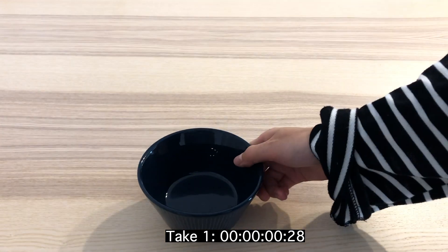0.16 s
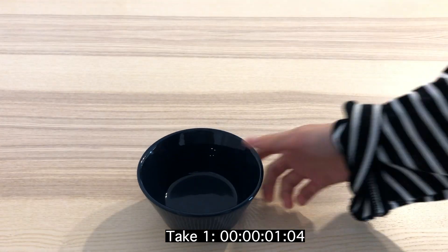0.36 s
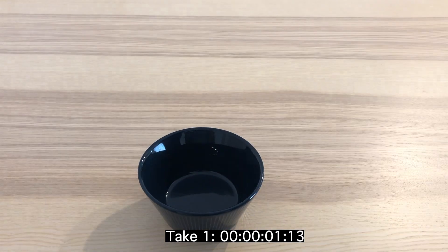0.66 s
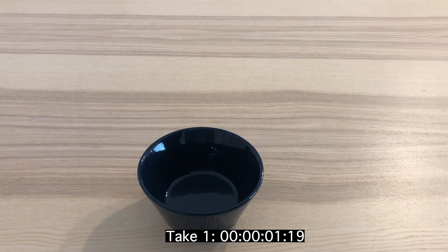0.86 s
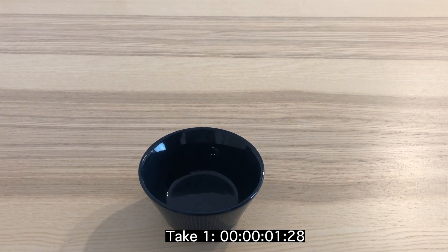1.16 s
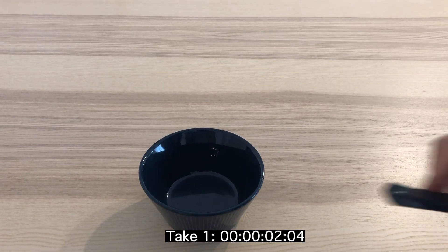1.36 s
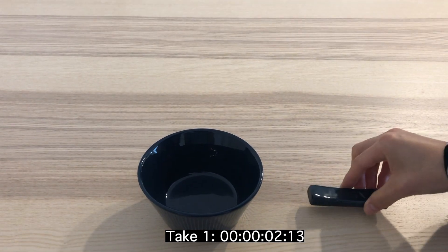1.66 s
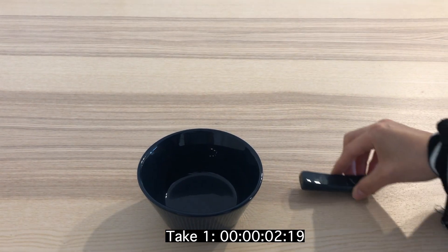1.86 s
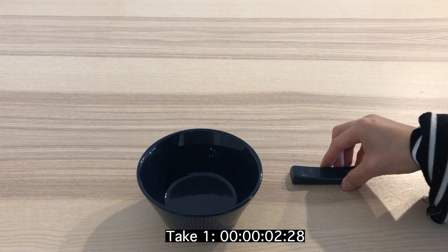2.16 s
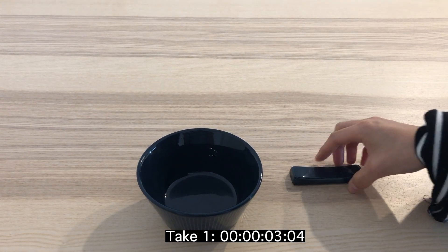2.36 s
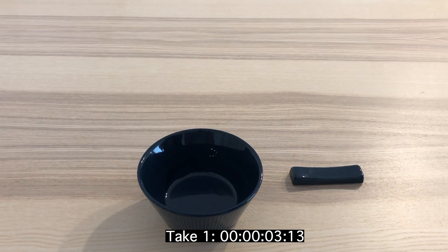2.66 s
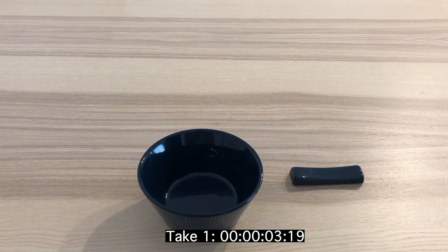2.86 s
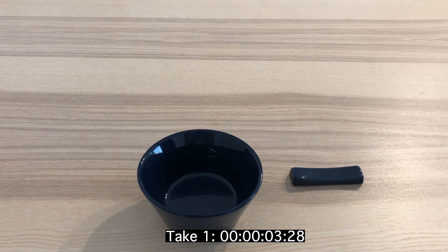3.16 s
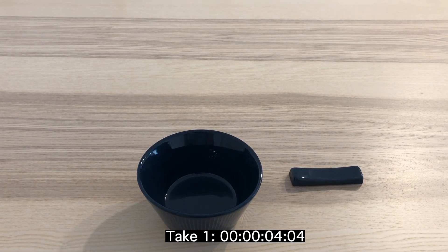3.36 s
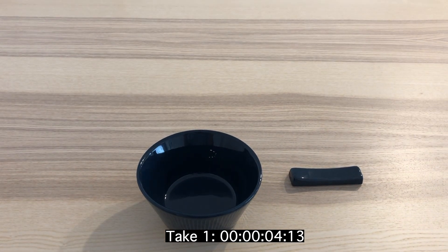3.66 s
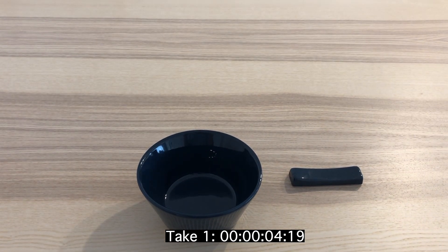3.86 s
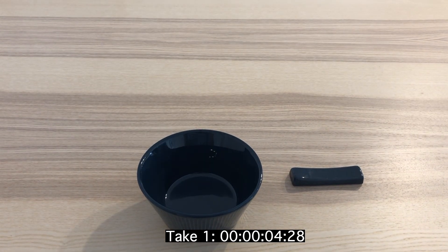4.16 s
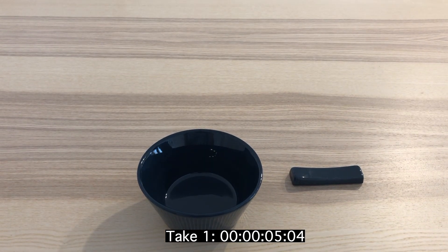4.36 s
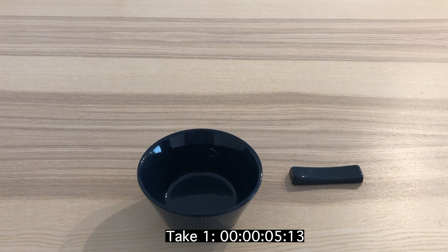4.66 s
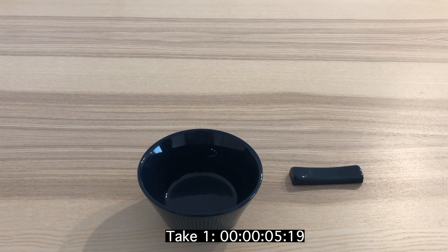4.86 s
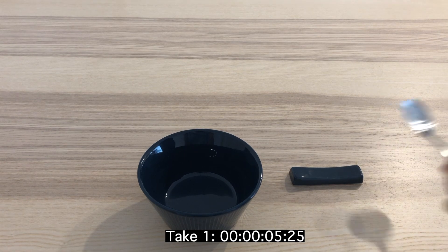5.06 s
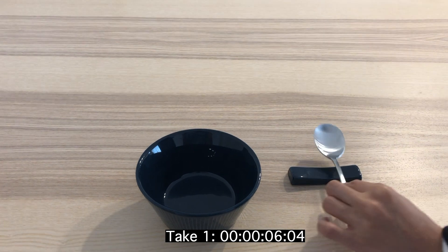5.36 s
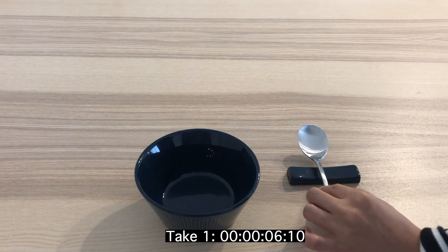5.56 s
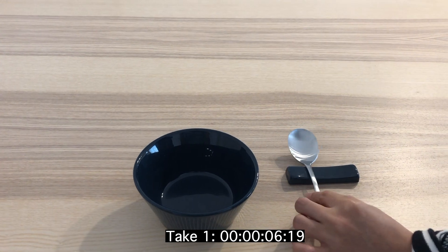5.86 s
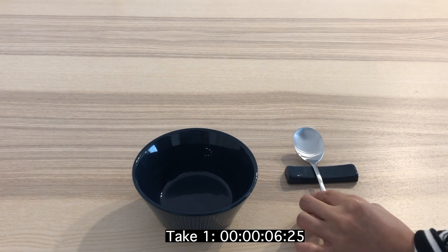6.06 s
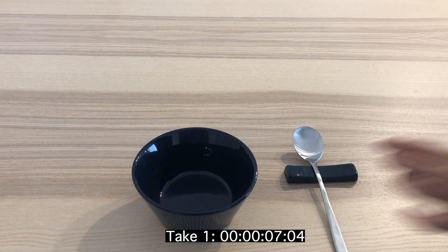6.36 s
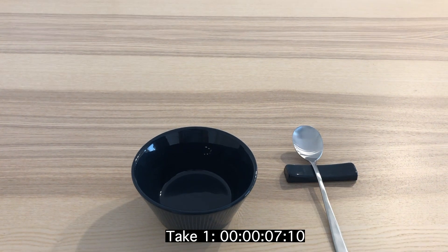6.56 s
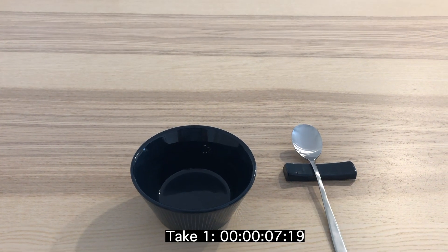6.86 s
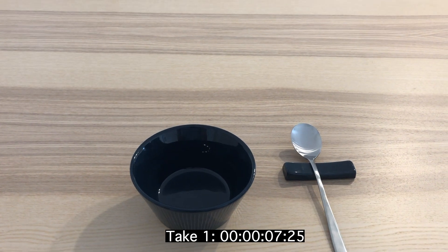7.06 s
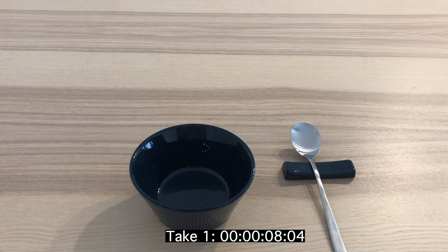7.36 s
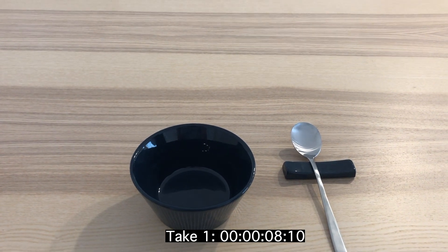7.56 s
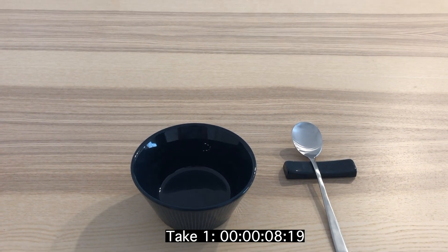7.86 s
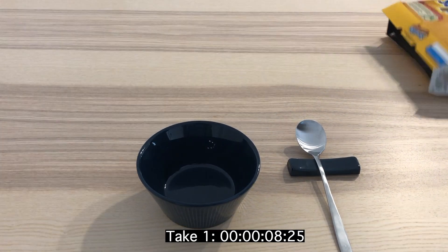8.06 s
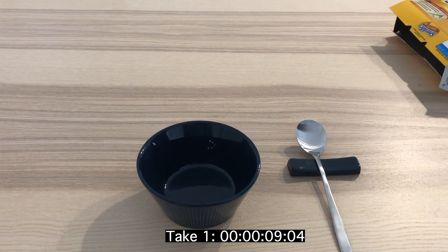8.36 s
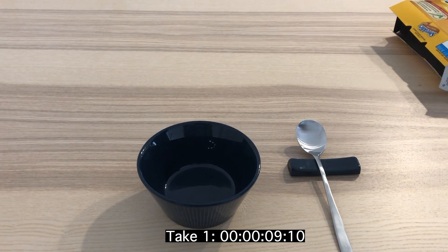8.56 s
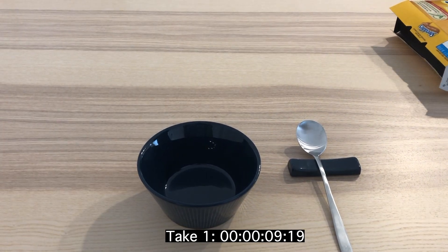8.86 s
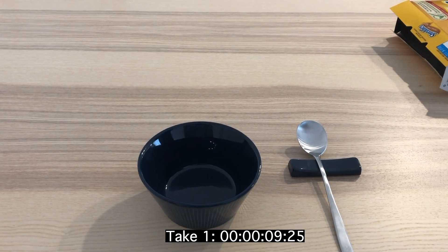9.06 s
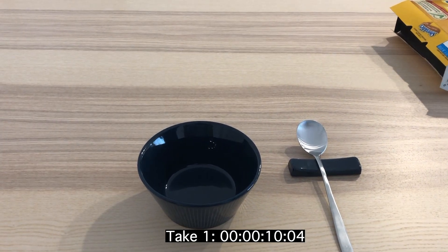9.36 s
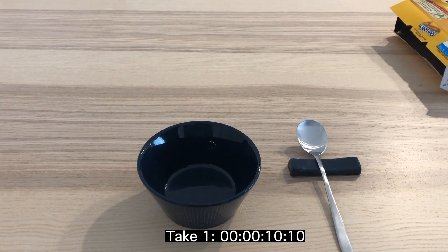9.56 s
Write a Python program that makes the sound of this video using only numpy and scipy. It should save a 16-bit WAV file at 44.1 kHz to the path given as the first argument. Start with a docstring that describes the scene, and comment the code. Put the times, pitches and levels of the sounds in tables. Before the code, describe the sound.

Close by in a small room with a faint hum, a wooden table is set with pauses between the items: two dull knocks of a ceramic bowl, the clack of a spoon rest, a bright jingle of cutlery and a spoon's quick double clink. Then a plastic cereal bag is shoved over the wood in scuffs and small groans, lands with a thump and crackles crisply as it is handled.

```python
"""A ceramic bowl knocks twice on a wooden table, then a spoon rest clatters down, in a small, quiet room.
Each blow clacks and makes the board boom. A spoon jingles out of the cutlery, leaving one piece
rocking, and clinks onto the rest. Then a plastic cereal bag is pushed over the table in scuffs and
groans, bumps down and crinkles in the hand: its creases buckle and the hollow bag answers."""
import sys
import numpy as np
from scipy import signal
from scipy.fft import rfft, irfft
from scipy.io import wavfile

SR = 44100
rng = np.random.default_rng(int(sys.argv[2]) if len(sys.argv) > 2 else 0)


def store_wav(level_fs):
    """Save 16-bit WAV to argv[1]."""
    pcm = np.round(np.clip(np.atleast_2d(level_fs), -1, 1) * 32767)
    wavfile.write(sys.argv[1], SR, pcm.T.astype(np.int16))


N = 427769
T = np.arange(N) / SR
TOP_HZ = 16050

# Large creases snapping. Each row: start in seconds, level in dB, centre in Hz, hollow body offset in dB.
SNAPS = [(7.0159, -32, 2960, -18), (7.971, -18, 3020, -7), (8.122, -19, 2010, -22),
         (8.2787, -25, 3010, 2.5), (8.2864, -15.5, 3130, -16), (8.415, -17, 4580, -6),
         (8.4328, -25.5, 5330, -9), (8.4462, -26.5, 2800, -7.5), (8.4885, -5, 5860, -17),
         (8.5322, -14, 2700, -5), (8.625, -27.5, 4570, -1), (8.6627, -18.5, 6900, -9.5),
         (8.7478, -22.5, 3000, -9.5), (8.818, -12, 3740, -7), (8.849, -19.5, 2180, -1),
         (8.8866, -16, 4570, -2.5), (8.904, -15.5, 2970, -1), (8.915, -13, 4360, -5.5),
         (8.9924, -16.5, 3650, -4.5), (9.0577, -14, 2000, 0.5), (9.0614, -20, 8970, -10.5),
         (9.0824, -11.5, 1860, -20), (9.0985, -20.5, 5640, -16), (9.1169, -23, 2130, -1),
         (9.172, -19, 2900, -5), (9.1789, -17.5, 4500, -4), (9.2033, -18, 2800, -5),
         (9.2169, -14, 7000, -5.5), (9.2213, -17.5, 5440, -3), (9.3784, -22, 4560, -1),
         (9.5249, -19.5, 4010, -4), (9.5829, -18, 2320, -2.5), (9.62, -26, 6130, 4),
         (9.6521, -11.5, 4150, -10.5), (9.6792, -9.5, 5480, -10), (9.6872, -15, 5330, -9),
         (9.6939, -10, 5130, -8)]
# The bright plastic film and the bag's hollow body. Each row: frequency in Hz, gain in dB.
FILM_EQ = [(200, -10), (1000, -15), (2000, 2), (5000, 6), (7000, 7), (10000, 3.5), (15000, 7)]
HOLLOW_EQ = [(60, -16), (130, 7.5), (190, 1.5), (260, 6.5), (340, -1.5), (430, 3.5), (650, 0), (1000, 2.5),
             (1700, -1), (2500, -7), (5000, -21)]

def bag_snaps():
    """A crease buckles in a millisecond; its facet flutters briefly and the hollow bag answers."""
    out = np.zeros(N)
    for s, db, hz, hollow_db in SNAPS:
        # every facet has its own size and so its own few resonances
        pitches = np.minimum(hz * np.exp(.35 * rng.standard_normal(6)), TOP_HZ)
        flutter = ring([(f, 0, .014) for f in pitches], .1)
        buckle = blow(burst(.0038, .1)) + amp(-5.5) * blow(burst(.055, .1))
        film = band(colour(buckle, FILM_EQ), [hz / 1.72, hz * 1.24], "band", order=1)
        facet = blow(film) + amp(-3.5) * blow(flutter)
        crack = band(burst(.0047, .1), 11400, "high")
        hollow = colour(burst(.049, .1), HOLLOW_EQ)
        snap = (blow(facet, span=.00022)
                + amp(3 + 1.3 * db) * blow(crack, span=.00023)  # only hard snaps reach the top octave
                + amp(hollow_db) * blow(hollow, span=.00028))
        add(out, s + .0006, amp(db) * snap)
    return out


POPS_PER_S, POP_HZ, POP_T60_S, POP_DB, POP_SPREAD_DB = 70, 3300, .016, -10, 3.5
# Hand squeezes. Each row: start in seconds, length in seconds, force in dB, crackle offset in dB.
SQUEEZES = [(8.41, .07, -45, -8.5), (8.476, 0.048, -44, 0), (8.6, .2, -53.5, -3), (8.802, .09, -37.5, -8),
            (8.885, 0.26, -36.5, -3.5), (9.154, 0.068, -32.5, -2), (9.322, 0.071, -42.5, -1),
            (9.443, 0.25, -44, -4), (9.668, .03, -27, -13)]
# The crisp tone of tiny creases. Each row: frequency in Hz, gain in dB.
CRACKLE_EQ = [(880, -35), (1500, -11), (2560, -5), (2970, 2), (3350, -3.5), (6830, -7), (9750, -11),
              (14500, -10), (16000, -27)]

def bag_crinkle():
    """Tiny creases crackle and small ones pop as the hand tightens, over the filled bag's dull rustle."""
    crackle, rustle = np.zeros((2, N))
    for s, length, db, crackle_db in SQUEEZES:
        squeeze = amp(db) * stroke(s, length, attack_s=.012, sag_db_per_s=8, release_db_per_s=130)
        rustle = np.maximum(rustle, squeeze)
        crackle = np.maximum(crackle, amp(crackle_db) * squeeze)
    # every crease is its own short burst, so no two have the same colour
    energy = signal.lfilter([1], [1, -np.exp(-1 / (.0014 * SR))], grains(700, 2.3) ** 2)
    creases = colour(np.sqrt(energy) * rng.standard_normal(N), CRACKLE_EQ)
    body = colour(grains(700, 1.8), HOLLOW_EQ)
    body = band(body, 170, "high", order=1)  # held in the air, the bag has little bass
    out = amp(-5) * crackle * unit(creases) + amp(-3) * rustle * unit(body)
    first = SQUEEZES[0][0]
    duration = T[-1] - first
    for place, size, *facet in rng.random((int(POPS_PER_S * duration), 7)):
        s = first + place * duration
        pitches = POP_HZ * 2 ** (3 * np.array(facet) - 1.5)
        pop = blow(ring([(hz, 0, POP_T60_S) for hz in pitches], .03))
        pop_db = POP_DB + POP_SPREAD_DB * min(-np.log(size), 2)
        add(out, s, crackle[int(s * SR)] * amp(pop_db) * pop)  # pops ride the crackle envelope
    return out


GROAN_SAG_OCTAVES_PER_S = 2.94  # the slips slow down as the shove eases
# Shoves of the bag. Each row: start in seconds, length in seconds, force in dB, drumming offset in dB.
PUSHES = [(7.012, 0.17, -46, 4.5), (7.282, 0.09, -50, 0.5), (7.536, 0.19, -35, 3), (7.662, 0.13, -34.5, 2),
          (7.802, 0.16, -36, 1), (8.116, 0.12, -43.5, 4.5), (8.271, 0.074, -43, -6)]
# Stick-slip groans. Each row: start in seconds, level in dB, length in seconds, opening pitch in Hz.
GROANS = [(7.115, -43.5, .025, 507), (7.297, -42, 0.057, 515), (7.384, -47.5, .02, 524),
          (7.565, -34.5, 0.069, 285.2), (7.713, -36, 0.049, 251.6)]
# Low board drumming, midrange scuff and airy film hiss. Each row: frequency in Hz, gain in dB.
DRUM_EQ = [(30, -33), (70, -17), (135, -2), (180, 2), (240, 7), (300, 5.5), (420, -7), (800, -38)]
SCUFF_EQ = [(200, -23), (450, 3.5), (600, 1.5), (900, -0.5), (1600, -3.5), (2300, -8.5), (5000, -32)]
HISS_EQ = [(880, -22.5), (1500, 0), (2020, -11.5), (3030, -5.5), (5070, -11.5), (6000, -11.5), (7240, -17),
           (12600, -24.5), (16000, -41)]

def bag_slide():
    """Countless small slips on the wood drum the board, scuff the bag and make its film hiss."""
    force, drum = np.zeros((2, N))
    for s, length, db, drum_db in PUSHES:
        push = amp(db) * stroke(s, length, attack_s=.008, sag_db_per_s=28.5, release_db_per_s=165)
        force = np.maximum(force, push)  # the firmest shove prevails
        drum = np.maximum(drum, amp(drum_db) * push)
    uneven_grip = waver(30, 2.5)
    catches = grains(9000, 2.6)
    out = (amp(-2.5) * drum * unit(colour(grains(900, 2.9), DRUM_EQ))
           + amp(-2) * force * unit(uneven_grip * colour(grains(3000, 1.6), SCUFF_EQ))
           + amp(-6) * force * unit(uneven_grip * colour(catches, HISS_EQ)))
    for s, db, length, hz in GROANS:
        count = int(length * SR)
        pitch = hz * 2 ** (-GROAN_SAG_OCTAVES_PER_S * T[:count])
        turns = np.cumsum(pitch * waver(300, 1.2)[:count]) / SR
        slips = band(signal.sawtooth(2 * np.pi * turns), 900, "low") * waver(120, 3)[:count]
        add(out, s, amp(db) * unit(slips) * signal.windows.tukey(count, .2))
    return out


def bag_flex(x):
    """As the bag deforms, its resonances swell and fade one by one."""
    edges = np.geomspace(330, 6000, 8)
    swells = sum((waver(hz=18.4, db=3.5) - 1) * band(x, [lo, hi], "band", order=1)
                 for lo, hi in zip(edges, edges[1:]))
    return amp(-1) * (x + swells / 2)


SETTLE_S, SETTLE_HZ, SETTLE_CLACK_DB = .013, 222, -5.5
# Bowl, rest, spoon and bag hit the table. Each row: start in seconds, clack in dB,
# contact cut-off in Hz, boom in dB, settling thud as a multiple of the boom.
KNOCKS = [(.1220, -25.5, 705, -25.5, .9), (0.3427, -28, 870, -26.5, .6), (2.1197, -22, 2230, -42.5, 0),
          (2.138, -32, 1500, -51, 0), (2.1455, -43, 2280, -55, 0), (2.3016, -43, 1800, -36, 0),
          (2.309, -37, 1740, -40.5, 0), (2.3330, -26.5, 1790, -34.5, 0), (5.8269, -28.5, 2000, -31.5, 0),
          (5.878, -43.5, 1500, -40.5, 0), (5.9436, -31.5, 1840, -45, 0), (5.949, -28, 1100, -38.5, 0),
          (6.096, -53.5, 1200, -56.5, 0), (6.129, -55.5, 800, -47, 0), (7.603, -42, 366, -32.5, 0),
          (7.939, -28, 1460, -31.5, 2.8), (8.0883, -44, 1980, -40, .8), (8.1226, -32.5, 2060, -34, 1.6),
          (8.1892, -37.5, 1700, -36.5, .7)]

def table_knocks():
    """Things land on the board; heavy ones hit edge first, then settle with a duller thud."""
    out = np.zeros(N)
    for s, clack_db, contact_hz, boom_db, settling in KNOCKS:
        add(out, s, knock(clack_db, contact_hz, boom_db))
        if settling > 0:
            add(out, s + SETTLE_S, settling * knock(boom_db + SETTLE_CLACK_DB, SETTLE_HZ, boom_db))
    return out


HARD_HZ, TICK_DB, TICK_DB_PER_OCTAVE = 1900, -7.5, 11  # the tick against the clack grows with hardness
# The board's booming low modes. Each row: frequency in Hz, level in dB, t60 in seconds.
BOARD_MODES = [(88, -12, .25), (128, -6, .28), (142, -3, .5), (200, -3, .17), (214, -3, .22),
               (258, -3, .17), (300, -7, .12), (385, -4, .1), (404, 1, .18), (438, -3, .1), (480, -6, .09),
               (542, -4, .11), (646, -7, .1), (792, -6, .13), (850, -9, .1)]
# The wood's dense upper modes, and the tick of glaze or steel. Each row: frequency in Hz, gain in dB.
WOOD_EQ = [(30, -68), (100, -23.5), (330, -8.5), (500, -0.5), (850, 0.5), (1200, -1), (1750, -2),
           (2400, -6.5), (3300, -7), (3900, -4.5), (7000, 2), (16000, -1)]
TICK_EQ = [(700, -16), (1600, 8.5), (2400, 3.5), (3400, 2.5), (3900, -13), (4600, -9), (7000, -17),
           (10000, -26), (16000, -46.5)]

def knock(clack_db, contact_hz, boom_db):
    """One blow ticks, clacks and sets the board booming; softer contact takes off treble and tick."""
    wood = blow(burst(.076, .6))
    wood[0] += 19  # the first wavefront, straight from the point of contact
    clack = band(colour(wood, WOOD_EQ), contact_hz, "low", order=5)
    boom = band(band(ring(BOARD_MODES, .6), contact_hz, "low"), 85, "high")
    out = amp(clack_db) * blow(clack) + amp(boom_db) * blow(boom)
    tick_db = clack_db + TICK_DB + TICK_DB_PER_OCTAVE * np.log2(contact_hz / HARD_HZ)
    add(out, 0, amp(tick_db) * blow(colour(burst(.015, .06), TICK_EQ)))
    return out


# The spoon lands. Each row: start in seconds, ring in dB, contact cut-off in Hz, tick in dB,
# fraction of ring time the fingers leave, handle bending offset in dB.
CLINKS = [(5.8259, -27.5, 15800, -31, 0.6, -2.5), (5.8396, -31, 14800, -43, 0.85, -2),
          (5.9421, -34.5, 3840, -30, 0.67, 3), (5.9487, -28.5, 16000, -38, 0.57, -14)]
# The spoon's steel ring. Each row: frequency in Hz, level in dB, t60 in seconds.
SPOON_MODES = [(1453, -10, .06), (1733, -10, .08), (3418, -7, .4), (4867, 5, .035), (5130, -4, .035),
               (6750, -14, .12), (7578, -13, .16), (8385, -9, .11), (8515, -5, .15), (8613, -9, .15),
               (9430, -12, .17), (10050, -5, .04), (11300, -18, .22), (12250, -7, .07), (12870, 1, .12),
               (12950, -2, .1), (13080, -4, .08), (14850, 1, .1), (14950, -1, .1)]

def spoon():
    """Steel meets ceramic: a hard tick and the ring of the spoon, shorter while the fingers grip it."""
    out = np.zeros(N)
    for s, ring_db, contact_hz, tick_db, freedom, bend_db in CLINKS:
        # the place of contact sets how hard the handle's long bending mode is struck
        modes = [(hz, db + bend_db * (t60 > .3), t60 * freedom) for hz, db, t60 in SPOON_MODES]
        steel = band(ring(modes, .5), contact_hz, "low", order=6)
        tick = band(band(burst(.063, .2), 2300, "high"), contact_hz, "low")
        add(out, s, amp(ring_db) * blow(steel))
        add(out, s, amp(tick_db) * blow(tick))
    return out


CONTACTS_PER_S, CLASH_S, CHATTER_DB, CHATTER_RELEASE_DB_PER_S = 600, .03, -12.5, 260
ROCK_START_S, ROCK_GAP_S, ROCK_GAP_KEPT, ROCK_DB, ROCK_FADE_DB_PER_S = 3.982, .037, .97, -59, 31.5
# Shakes of the cutlery. Each row: start in seconds, level in dB, length in seconds.
JINGLES = [(3.673, -32.5, 0.1), (3.781, -24, 0.12)]
# The pile's short ring and one piece's long ring. Each row: frequency in Hz, level in dB, t60 in seconds.
CUTLERY_MODES = [(1000, -18, .1), (1660, -12, .1), (1723, -5, .18), (4027, 0, .16), (4180, -5, .1),
                 (4867, -2, .1), (5120, 1, .1), (6700, -7, .13), (7768, -6, .15), (8689, -4, .15),
                 (9620, -8, .18), (10230, -6, .18), (10610, -9, .18), (11220, -4, .12), (11310, -2, .13),
                 (12800, 0, .13), (12990, 0, .17), (13190, 0, .12), (13870, -1, .14), (14050, -2, .17),
                 (15060, 4, .11), (15300, 0, .1)]
LOOSE_MODES = [(1200, -11, .3), (1744, -4, .3), (2616, -3, .4), (3420, -1, .5), (4064, -4, .3),
               (4440, -3, .35), (6804, 0, .3), (7000, 0, .4), (7881, -10, .4), (9647, -9, .4),
               (10290, -7, .5), (11530, -7, .5), (14100, -11, .35)]
# The bright chatter of steel on steel. Each row: frequency in Hz, gain in dB.
CHATTER_EQ = [(290, -54), (500, -50), (960, -14.5), (1550, -18), (1690, -16.5), (3290, -14), (4090, -1),
              (4530, -6), (5020, -10), (6330, -7), (12100, -10.5), (14500, -9), (16000, -37)]

def cutlery(touches=18):
    """Each shake clashes, then chatters on in quick contacts; one loose piece rocks to rest."""
    out = np.zeros(N)
    t = T[:int(.3 * SR)]
    for s, db, length in JINGLES:
        chatter = amp(CHATTER_DB - CHATTER_RELEASE_DB_PER_S * np.maximum(t - length, 0))
        force = np.where(t < CLASH_S, 1, chatter)
        contacts = force * (rng.random(len(t)) < CONTACTS_PER_S / SR) * rng.uniform(-.96, 1, len(t))
        contacts[0] = 1.24  # the opening hit is the hardest
        metal = (blow(ring(CUTLERY_MODES, .8))
                 + blow(colour(burst(.045, .8), CHATTER_EQ))
                 + amp(-12) * blow(ring(LOOSE_MODES, .8)))
        add(out, s, amp(db) * blow(signal.fftconvolve(metal, contacts)))
    s = ROCK_START_S
    for k in range(touches):  # each touch comes sooner and weaker than the last
        ping = blow(ring(LOOSE_MODES, .5))
        tick = amp(-2) * blow(band(burst(.03, .5), [1500, 7000], "band"))
        add(out, s, amp(ROCK_DB - ROCK_FADE_DB_PER_S * (s - ROCK_START_S)) * (ping + tick))
        s += ROCK_GAP_S * ROCK_GAP_KEPT ** k
    return out


# Light touches on the bowl. Each row: start in seconds, level in dB.
BOWL_TOUCHES = [(0.32, -56.5), (0.3427, -53)]
# The bowl's ceramic ping. Each row: frequency in Hz, level in dB, t60 in seconds.
BOWL_MODES = [(1577, -0.5, 0.34), (2815, -30, 0.27), (6100, -4, 0.076), (12450, -18, .1), (14550, -18, .1)]

def bowl():
    """The bowl rings faintly, held between finger and thumb."""
    out = np.zeros(N)
    for s, db in BOWL_TOUCHES:
        add(out, s, amp(db) * blow(ring(BOWL_MODES, .4)))
    return out


# Passes of hand and sleeve. Each row: midpoint in seconds, level in dB, length in seconds.
BRUSHES = [(2.019, -62.5, 0.12), (2.432, -63.5, 0.15), (2.715, -62.5, 0.13), (3.1, -65, 0.047),
           (3.219, -62.5, .047), (3.401, -62.5, 0.028), (4.448, -67, 0.12), (4.522, -56, 0.046),
           (6.328, -63.5, 0.039), (7.38, -49.5, 0.035), (7.506, -62.5, .085), (7.581, -38.5, 0.1),
           (7.69, -40.5, 0.061), (7.838, -43.5, 0.053)]
# The soft tone of rubbing fibres. Each row: frequency in Hz, gain in dB.
BRUSH_EQ = [(290, -34.5), (500, -2.5), (1820, -3), (2330, -8.5), (3110, -4.5), (11100, -14), (16000, -23)]

def brushes():
    """Hand and sleeve brush past things in soft swells of fibre friction."""
    env = np.zeros(N)
    for s, db, length in BRUSHES:
        add(env, s - length / 2, amp(db) * np.hanning(int(length * SR)) ** .5)
    return env * unit(colour(grains(4000, 2.7), BRUSH_EQ))


# The small room's decay. Each row: frequency in Hz, t60 in seconds.
ROOM_T60 = [(125, 0.52), (500, 0.34), (2000, 0.24), (6000, 0.29), (16000, 0.16)]

def room(x):
    """Nearby walls return a short diffuse tail that dies sooner in the treble."""
    edges = np.geomspace(50, 18000, 9)
    tail = sum(band(burst(along(np.sqrt(lo * hi), ROOM_T60), .6), [lo, hi], "band")
               for lo, hi in zip(edges, edges[1:]))
    tail *= np.clip(T[:len(tail)] / .0058 - .4, 0, 1)  # short pre-delay and fade-in
    tail /= np.sqrt(np.sum(tail ** 2))
    tail = colour(tail, [(100, -12.5), (500, -10.5), (1500, -12), (4000, -13), (15000, -18)])
    return x + signal.fftconvolve(x, tail)[:N]


# Bass-heavy room air. Each row: frequency in Hz, gain in dB.
AIR_EQ = [(15, -63), (25, -38), (48, -10), (84, -17.5), (99, -10.5), (120, 1), (149, -14.5), (229, -10),
          (249, -14.5), (516, -22.5), (754, -27), (1260, -29.5), (1650, -34), (11000, -41), (16000, -45)]
# Mains hum partials. Each row: frequency in Hz, level in dB.
HUM = [(60, -70.5), (120, -67.5)]

def room_tone(air_db=-58.5):
    """A bed of quiet air whose rumble wavers, with a trace of mains hum."""
    air = amp(air_db) * unit(colour(rng.standard_normal(N), AIR_EQ))
    hum = sum(amp(db) * np.sqrt(2) * np.sin(2 * np.pi * hz * T) for hz, db in HUM)
    return air + (waver(6, .98) - 1) * band(air, 490, "low") + hum


def amp(db):
    """Decibels to gain."""
    return 10 ** (np.asarray(db) / 20)


def unit(x):
    """Scale a lasting sound to rms 1."""
    return x / np.sqrt(np.mean(x ** 2))


def blow(x, span=.013):
    """Scale a short sound to the energy of rms 1 held for span seconds."""
    return x / np.sqrt(np.sum(x ** 2) / (span * SR))


def add(out, s, x):
    """Mix x into out at s seconds."""
    i = int(np.clip(s * SR, 0, N - 1))
    out[i:i + len(x)] += x[:N - i]


def fade(t60, length):
    """Exponential decay over length seconds, falling 60 dB every t60."""
    return np.exp(-np.log(1000) * T[:int(length * SR)] / t60)


def burst(t60, length):
    """Decaying noise: modes too dense to tell apart."""
    env = fade(t60, length)
    return env * rng.standard_normal(len(env))


def along(hz, points):
    """Read (Hz, value) points on a log-frequency axis."""
    f, v = np.transpose(points)
    return np.interp(np.log(np.maximum(hz, 1)), np.log(f), v)


def colour(x, points, size=4096):
    """Minimum-phase EQ through the given (Hz, dB) points."""
    gains = amp(along(np.fft.rfftfreq(size, 1 / SR), points))
    cepstrum = irfft(np.log(gains))
    cepstrum[1:size // 2] *= 2
    cepstrum[size // 2 + 1:] = 0
    return signal.fftconvolve(x, irfft(np.exp(rfft(cepstrum))))[:len(x)]


def band(x, hz, kind, order=2):
    """Butterworth filter."""
    sos = signal.butter(order, np.clip(hz, 10, SR / 2 - 1000), kind, fs=SR, output="sos")
    return signal.sosfilt(sos, x)


def ring(modes, length):
    """Damped modes; each contact weights and detunes them a little differently."""
    t = T[:int(length * SR)]
    weight, detune, side = rng.standard_normal((3, len(modes)))
    gains = amp(1.5 * weight) * np.sign(side)
    tunings = 1 + .001 * detune
    return sum(gain * amp(db) * fade(t60, length) * np.sin(2 * np.pi * hz * tuning * t)
               for gain, tuning, (hz, db, t60) in zip(gains, tunings, modes))


def grains(rate, spread_db):
    """Random tiny clicks, about rate a second, most weak and a few strong; rms 1."""
    sizes = amp(spread_db * np.minimum(rng.exponential(size=N), 4))
    return unit((rng.random(N) < rate / SR) * sizes * rng.choice([-1, 1], N))


def waver(hz, db):
    """A gain that wanders by about db, up to about hz times a second."""
    return amp(db * unit(band(rng.standard_normal(N), hz, "low")))


def stroke(start, length, attack_s, sag_db_per_s, release_db_per_s):
    """Envelope of one hand movement: a quick rise, a slow sag while it lasts, then a release."""
    t = np.maximum(T - start, 0)
    drop_db = sag_db_per_s * t + release_db_per_s * np.maximum(t - length, 0)
    return np.minimum(t / attack_s, 1) * amp(-drop_db)


def scene():
    """Everything on the table sounds into the same room, in mono over the room tone."""
    things = table_knocks() + bowl() + spoon() + cutlery() + brushes()
    bag = bag_flex(bag_slide() + bag_crinkle()) + bag_snaps()
    return (room(things + bag) + room_tone())[None]


def record(dry):
    """Master EQ: thin the deepest bass and cut the top steeply."""
    high_cut = signal.ellip(10, .2, 70, TOP_HZ, fs=SR, output="sos")
    return signal.sosfilt(high_cut, band(dry, 38, "high"))


dry = scene()
out = record(dry)
store_wav(out)
```